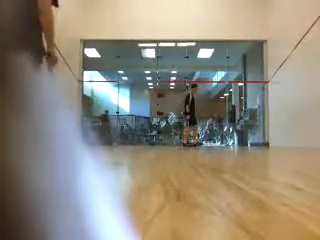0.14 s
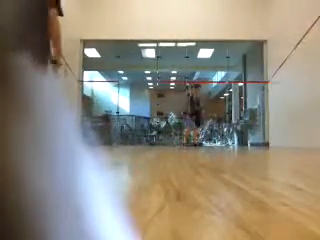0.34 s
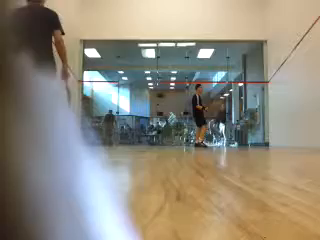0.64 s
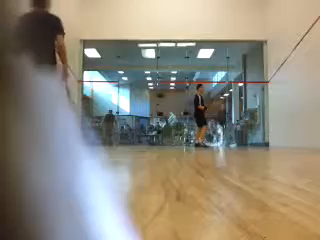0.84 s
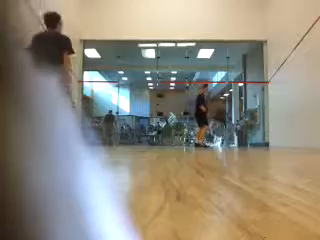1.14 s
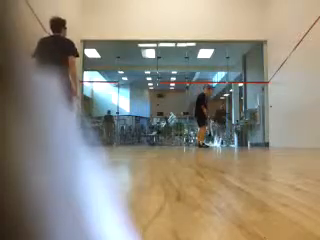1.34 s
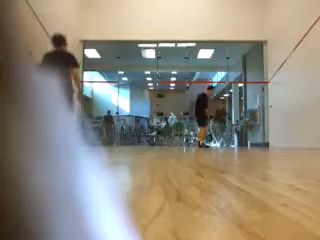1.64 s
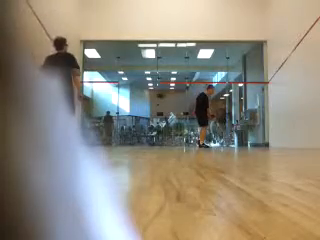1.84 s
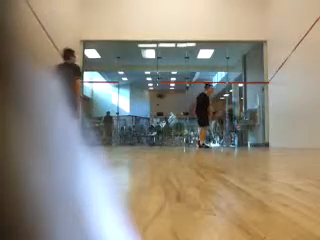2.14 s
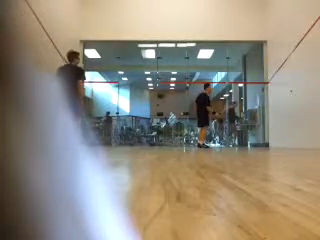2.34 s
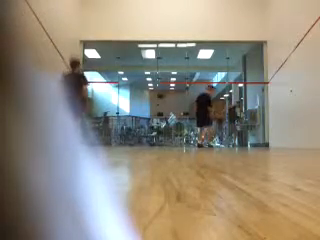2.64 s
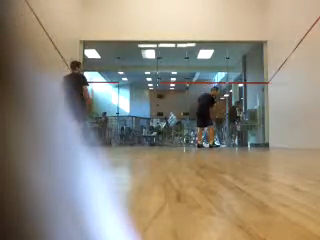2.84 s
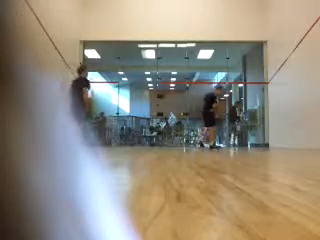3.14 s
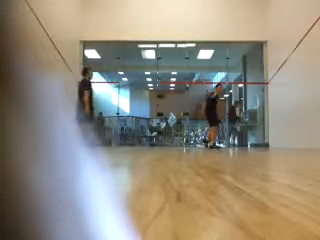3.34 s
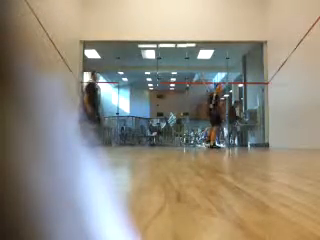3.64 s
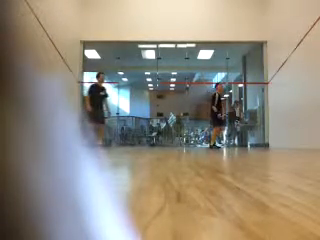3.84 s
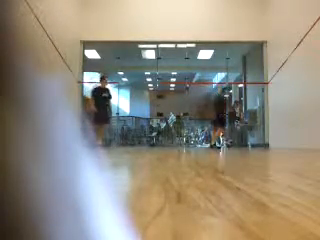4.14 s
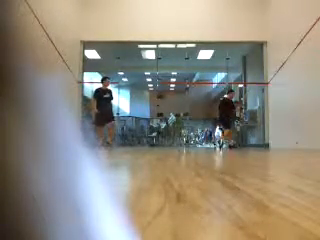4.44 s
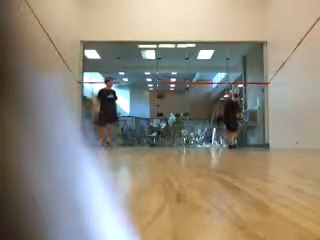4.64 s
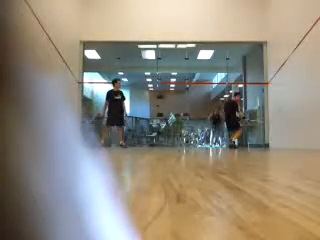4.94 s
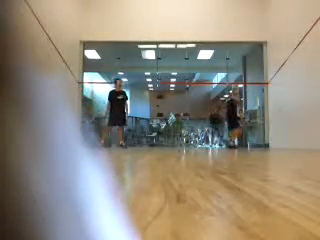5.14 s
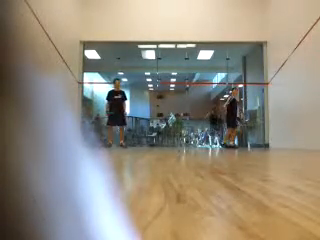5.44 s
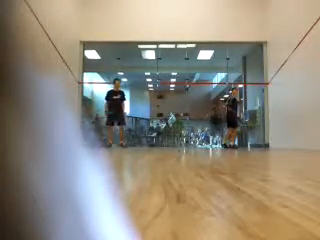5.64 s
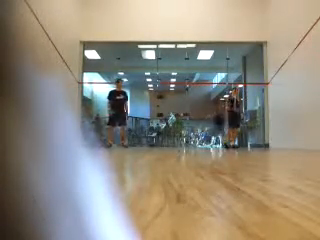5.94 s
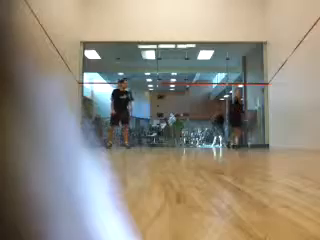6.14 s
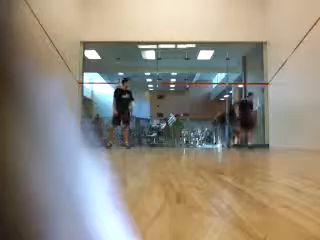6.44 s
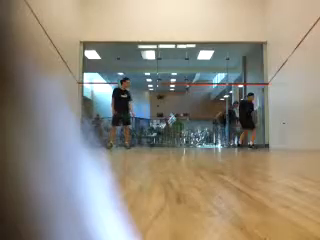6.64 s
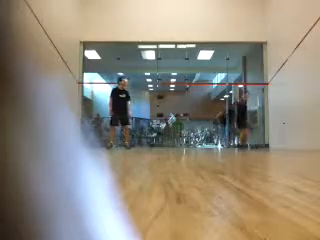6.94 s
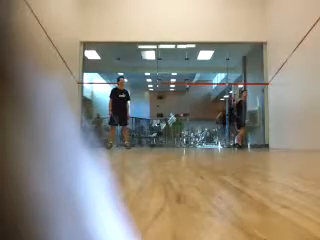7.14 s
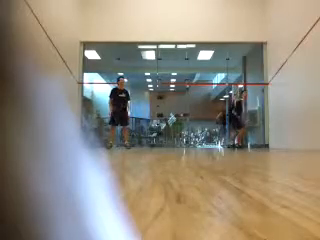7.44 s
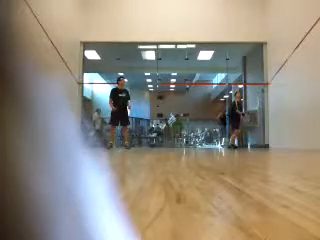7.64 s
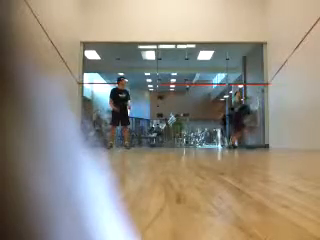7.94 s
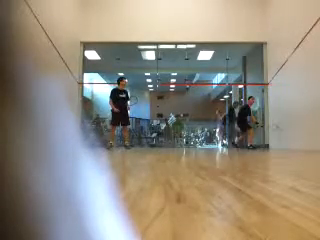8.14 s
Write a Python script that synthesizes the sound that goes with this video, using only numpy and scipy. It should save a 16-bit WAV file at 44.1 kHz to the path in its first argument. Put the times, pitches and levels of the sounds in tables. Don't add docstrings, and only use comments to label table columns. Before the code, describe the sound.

In a hugely echoing court, a hollow ball bounces, is struck by racquet, and slams the near front wall three times, overloading, with shoe squeaks.

```python
import sys
import numpy as np
from scipy import signal
from scipy.fft import rfft, irfft
from scipy.io import wavfile

SR = 44100
rng = np.random.default_rng(int(sys.argv[2]) if len(sys.argv) > 2 else 0)


def nominal_scale(level):
    x = np.asarray(level, float) / 20
    return 10 ** x


def to_wav(sig):
    pcm = np.clip(np.atleast_2d(sig), -1, 1) * 32767
    pcm = np.round(pcm).astype(np.int16)
    wavfile.write(sys.argv[1], SR, pcm.T)


N = 366030


def at_hz(points, hz):
    point_hz, value = np.array(points).T
    return np.interp(np.log(hz + 1), np.log(point_hz), value)


def colour(x, points):
    size = 4096
    response_db = at_hz(points, np.fft.rfftfreq(size, 1 / SR))
    cepstrum = irfft(np.log(nominal_scale(response_db)))
    cepstrum[1:size // 2] *= 2
    cepstrum[size // 2 + 1:] = 0
    impulse = irfft(np.exp(rfft(cepstrum)))
    return signal.fftconvolve(x, impulse)[:len(x)]


def unit_energy(x):
    return x / np.sqrt(np.sum(x ** 2) + 1e-20)


def knock(hz, t60, t):
    return unit_energy(np.sin(2 * np.pi * hz * t) * nominal_scale(-60 * t / t60))


def add(out, s, sound):
    i = round(s * SR)
    part = sound[max(-i, 0):][:N - max(i, 0)]
    out[max(i, 0):max(i, 0) + len(part)] += part


# frequency in Hz, t60 in seconds.
DECAY_T60 = [(50, 1.8), (130, 0.85), (220, 1.75), (420, 4.14), (1100, 4.1), (2900, 3.27), (4500, 2.54),
             (7700, 1.5)]


def court(parts, paths, build_up_s):
    hz, s, z = signal.stft(rng.standard_normal(3 * SR), SR, nperseg=1024)
    decay = nominal_scale(-60 * s / at_hz(DECAY_T60, hz)[:, None])
    dense = signal.istft(z * decay, SR, nperseg=1024)[1]
    t = np.arange(len(dense)) / SR
    dense *= 1 - np.exp(-(t / build_up_s) ** 1.1)
    first = np.zeros(len(dense))
    for delay_ms, level_db, bright in paths:
        i = round(delay_ms * SR / 1000)
        first[i:i + 2] += nominal_scale(level_db) * np.array([1, -np.clip(bright, 0, 1)])
    strength = np.sqrt(np.sum(np.abs(rfft(parts)) ** 2, axis=0))
    blend = np.roll(irfft(strength, parts.shape[1]), SR // 200)
    return signal.fftconvolve(parts.sum(axis=0), first) + signal.fftconvolve(blend, dense)


COURT_SIZE_M = (9.93, 6.41, 5.63)
MICROPHONE_PLACE_M = (.81, .41, .73)
FAR_ECHO_DB = (6.5, 2.5, -4.5)
NEAR_ECHO_DB = (0.5, -14.5, -4.5)
SOUND_M_PER_MS = 0.343
SPREAD_DB_PER_DECADE, MIRROR_UNTIL_MS = 10.5, 90
BRIGHT_FAR, BRIGHT_AFTER_MS = 0.68, 20


def mirrors(along_m, across_m, height_m, direct_db, direct_bright, panel_db=0):
    n = np.mgrid[-2:3, -4:5, -4:5].reshape(3, -1).T
    place, box = np.array([along_m, across_m, height_m]), np.array(COURT_SIZE_M)
    image = np.where(n % 2 == 0, n * box + place, (n + 1) * box - place)
    path_m = np.linalg.norm(image - MICROPHONE_PLACE_M, axis=1)
    delay_ms = (path_m - path_m.min()) / SOUND_M_PER_MS
    far = (np.abs(n) + (n > 0)) // 2
    near = np.abs(n) - far
    level_db = direct_db - SPREAD_DB_PER_DECADE * np.log10(path_m / path_m.min())
    level_db += far @ FAR_ECHO_DB + near @ NEAR_ECHO_DB
    level_db += panel_db * near[:, 0]
    bright = BRIGHT_FAR - (BRIGHT_FAR - direct_bright) * np.exp(-delay_ms / BRIGHT_AFTER_MS)
    return np.transpose([delay_ms, level_db, bright])[delay_ms < MIRROR_UNTIL_MS]


def ball(row, kind, ring_t60_s, lows_late_s):
    thud_hz, smack_hz, ring_hz, ring_db, crack_db = kind
    s, strength_db, thud_db, smack_db = row
    t = np.arange(SR // 10) / SR
    late = np.maximum(t - lows_late_s, 0)
    sweep_hz = 900 + 9000 * t / 0.002
    crack = np.sin(2 * np.pi * np.cumsum(sweep_hz) / SR) * (sweep_hz < 9900)
    parts = [
        nominal_scale(thud_db) * knock(thud_hz, 0.031, late),
        nominal_scale(smack_db) * knock(smack_hz, 0.0057, late),
        nominal_scale(ring_db) * knock(ring_hz, ring_t60_s, t),
        nominal_scale(crack_db) * unit_energy(crack),
    ]
    no_deep_bass = signal.butter(2, 90, "high", fs=SR, output="sos")
    return nominal_scale(strength_db) * signal.sosfilt(no_deep_bass, parts)


# frequency in Hz, density in dB per Hz.
HALL_SPECTRUM = [(25, 1), (60, 3.5), (150, 2.5), (350, 3.5), (800, -9.5), (1400, -12.5), (2500, -16),
                 (5000, -18), (8000, -31.5)]
HALL_DB = -30


def hall():
    hum = colour(rng.standard_normal(N), HALL_SPECTRUM)
    return nominal_scale(HALL_DB) * hum / hum.std()


# start in seconds, strength in dB, thud and smack in dB over it.
PAST_HIT = (-1.2, -4, -1, 0)
# thud, smack and cavity ring in Hz, ring and crack in dB over the strength.
PAST_HIT_KIND = (233, 430, 1427.5, -3, -7.5)


def earlier_hit():
    out = np.zeros(N)
    add(out, PAST_HIT[0], court(ball(PAST_HIT, PAST_HIT_KIND, 0.0075, 0.0045), [], 0.025))
    return out


# start in seconds, level in dB.
FOOTFALLS = [
    (0.043, -24.5),
    (0.703, -26.5),
    (1.699, -25),
    (2.314, -32),
    (2.42, -31.5),
    (4.58, -37),
    (4.871, -42),
]
FOOT_PLACE = (6.5, 2.5, .05, 18.8, .1)


def footfalls():
    out, t = np.zeros(N), np.arange(SR // 2) / SR
    for s, level_db in FOOTFALLS:
        thump = nominal_scale(level_db) * knock(150, 0.035, t)
        add(out, s, court(thump[None], mirrors(*FOOT_PLACE), 0.05))
    return out


# start in seconds, strength in dB, thud and smack in dB over it.
FLOOR_BOUNCES = [
    (.256, -26, 6.5, 3),
    (1.672, -29.5, 10.5, 3.5),
    (2.949, -27.5, 7, -25.5),
    (4.64, -25.5, -5, 3.5),
    (6.447, -26, 10, 3.5),
]
# thud, smack and cavity ring in Hz, ring and crack in dB over the strength.
FLOOR_KIND = (167, 378.5, 1442.5, -1.5, 0.5)
BOUNCE_PLACE = (7.6, 4.3, .05, 13.8, 0.39)


def bounces():
    out = np.zeros(N)
    for row in FLOOR_BOUNCES:
        contact = ball(row, FLOOR_KIND, 0.0022, 0.00015)
        add(out, row[0], court(contact, mirrors(*BOUNCE_PLACE), 0.011))
    return out


# start in seconds, length in seconds, first and last pitch in Hz, level in dB.
SOLE_SQUEAKS = [
    (0.9094, 0.0071, 5100, 4640, -14.5),
    (0.918, 0.014, 4460, 4636, -4.5),
    (2.68, .255, 5300, 5300, -54.5),
    (7.715, .47, 3810, 3930, -40),
]
# delay in ms, level in dB over the reverberation, brightness 0-1.
CHIRP_PATHS = [(0, 31.8, 0.0022), (25.13, 15, 0.004), (49.9, 11.6, 0.0049)]
LONG_SLIDE_PATHS = [(0, 42, 0)]
LONG_SLIDE_S = 0.1
SQUEAK_EDGE_S, SQUEAK_FADE_DB_PER_S = 0.0016, 14


def squeaks():
    out, t = np.zeros(N), np.arange(SR // 2) / SR
    for s, length_s, first_hz, last_hz, level_db in SOLE_SQUEAKS:
        done = np.minimum(t / length_s, 1)
        edges = np.minimum(np.minimum(done, 1 - done) * length_s / SQUEAK_EDGE_S, 1)
        pitch_hz = first_hz + (last_hz - first_hz) * done
        level = nominal_scale(level_db - SQUEAK_FADE_DB_PER_S * t) * edges
        tone = level * np.sin(2 * np.pi * np.cumsum(pitch_hz) / SR)
        paths = LONG_SLIDE_PATHS if length_s > LONG_SLIDE_S else CHIRP_PATHS
        add(out, s, nominal_scale(-33.5) * court(tone[None], paths, 0.0099))
    return out


# start in seconds, strength in dB, thud and smack in dB over it.
DRIBBLE_HITS = [
    (1.136, -33, 12.5, 3.7),
    (2.396, -34, 12, 0.57),
]
# thud, smack and cavity ring in Hz, ring and crack in dB over the strength.
DRIBBLE_MAKE_UP = (241.5, 377, 1417.5, 1, -.5)
# delay in ms, level in dB over the reverberation, brightness 0-1.
DRIBBLE_ARRIVALS = [(0, 34, 0.8), (25.6, 32, 0.6), (44.9, 34, 0.7), (92, 28, 1), (144, 27, .9)]


def dribbles():
    out = np.zeros(N)
    for row in DRIBBLE_HITS:
        add(out, row[0], court(ball(row, DRIBBLE_MAKE_UP, 0.0047, 0.0003), DRIBBLE_ARRIVALS, 0.0087))
    return out


# start in seconds, strength in dB, thud and smack in dB over it.
STROKES = [
    (3.305, -20.5, -8.5, -3.5),
    (5.113, -20, -14, 2.5),
    (6.885, -21, -18, 3),
]
# thud, smack and cavity ring in Hz, ring and crack in dB over the strength.
STROKE_KIND = (256.5, 406, 1264.5, -5.5, -1)
STROKE_PLACE = (8.6, 6, 0.65, 13.9, 0.091)
STRINGS_HZ, STRINGS_DB, STRINGS_T60_S = 1580, -10.5, 0.11


def racquet_hits():
    out, t = np.zeros(N), np.arange(SR // 10) / SR
    for row in STROKES:
        strings = nominal_scale(row[1] + STRINGS_DB) * knock(STRINGS_HZ, STRINGS_T60_S, t)
        parts = np.vstack([ball(row, STROKE_KIND, 0.0066, 0.00063), strings])
        add(out, row[0], court(parts, mirrors(*STROKE_PLACE), 0.0057))
    return out


# start in seconds, strength in dB, thud in dB over it, across in m, height in m.
FRONT_WALL_HITS = [
    (3.593, -4, -1, 2.79, 2.46),
    (5.436, -4, -5, 3.22, 2.36),
    (7.219, -3, -6, 3.88, 2.8),
]
# thud, smack and cavity ring in Hz, ring and crack in dB over the strength.
FRONT_WALL_KIND = (194, 429, 1218, -2.5, -4.5)
WALL_DIRECT_DB, WALL_BRIGHT = 20.5, 0.13
PANEL_GAIN_DB = 4.5
NEAR_RING_DB, NEAR_RING_T60_S = 22.5, 0.045


def wall_hits():
    out, t = np.zeros(N), np.arange(SR // 10) / SR
    for s, strength_db, thud_db, across_m, height_m in FRONT_WALL_HITS:
        paths = mirrors(0.03, across_m, height_m, WALL_DIRECT_DB, WALL_BRIGHT, PANEL_GAIN_DB)
        contact = ball((s, strength_db, thud_db, 0), FRONT_WALL_KIND, 0.0078, 0.00407)
        add(out, s, court(contact, paths, 0.041))
        add(out, s, nominal_scale(NEAR_RING_DB) * knock(FRONT_WALL_KIND[2], NEAR_RING_T60_S, t))
    return out


def scene():
    rally = earlier_hit() + bounces() + dribbles() + racquet_hits() + wall_hits()
    shoes = footfalls() + squeaks()
    return (hall() + rally + shoes)[None]


def roll_off(x):
    return signal.sosfilt(signal.butter(12, 8830, fs=SR, output="sos"), x)


# frequency in Hz, response in dB.
HOUSING_RESPONSE = [(20, -17), (60, -3), (150, -2.5), (400, 0.5), (540, -2), (700, 0), (880, -4.5),
                    (1350, -1), (1700, 1.5), (2100, -4), (2800, -12), (3800, -5.5), (5250, 0),
                    (8000, -21.5)]
# frequency in Hz, response in dB.
CONVERTER_RESPONSE = [(5500, 0), (6500, -1.5), (7500, -14.5), (8500, -29), (9200, -45.5), (9600, -100)]
OVERLOAD = 0.71


def record(dry):
    x = colour(dry[0], HOUSING_RESPONSE) / OVERLOAD
    x = OVERLOAD * x / (1 + np.abs(x) ** 6) ** (1 / 6)
    return roll_off(colour(x, CONVERTER_RESPONSE)[None])


dry = scene()
out = record(dry)
to_wav(out)
```